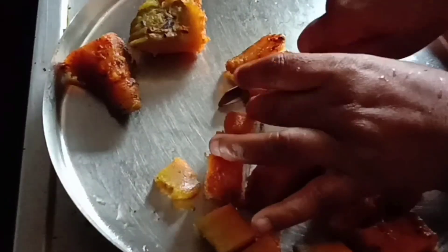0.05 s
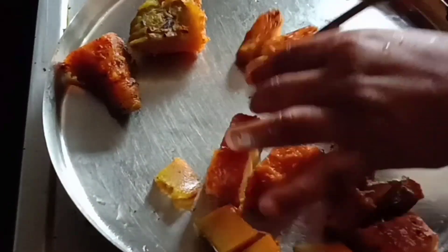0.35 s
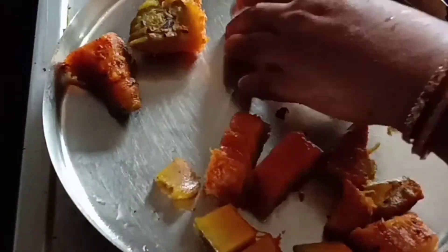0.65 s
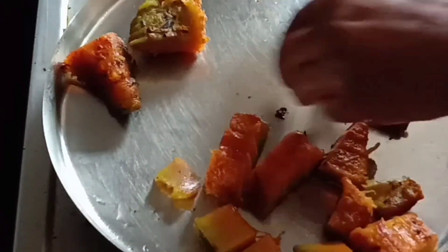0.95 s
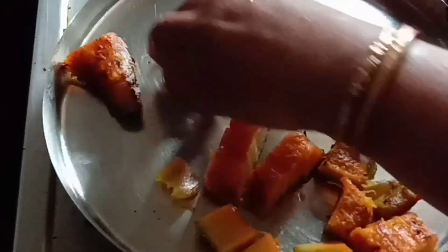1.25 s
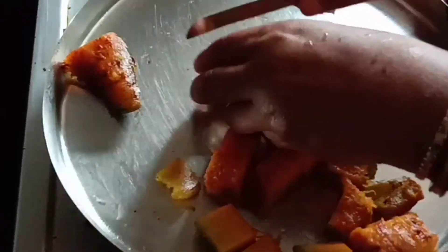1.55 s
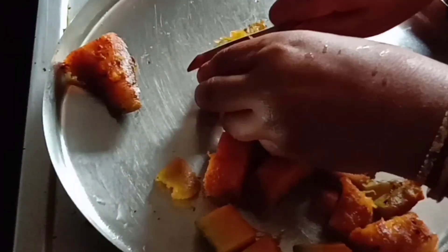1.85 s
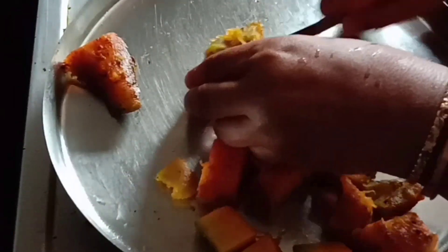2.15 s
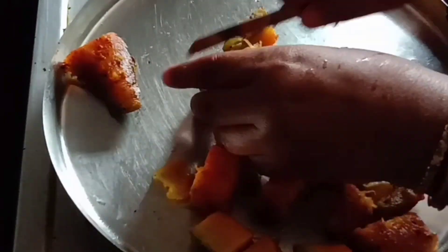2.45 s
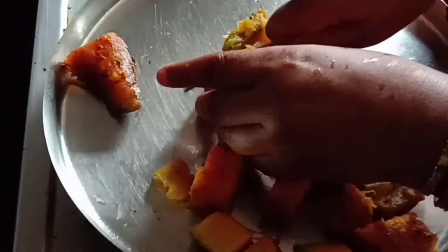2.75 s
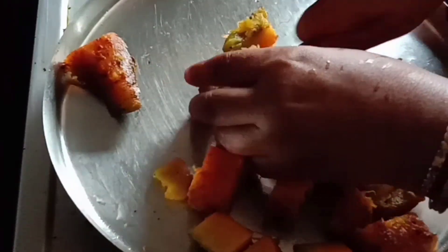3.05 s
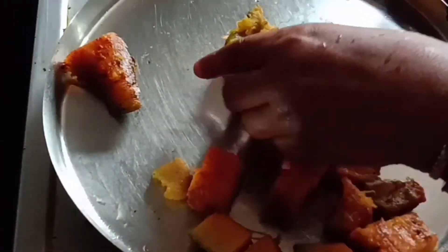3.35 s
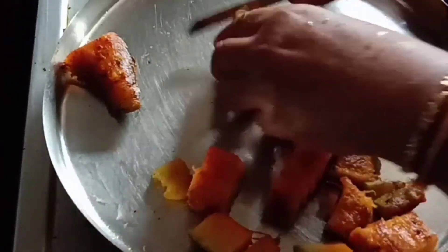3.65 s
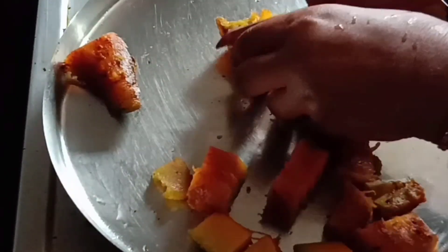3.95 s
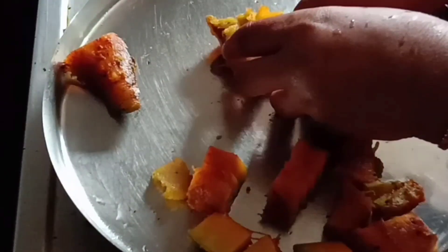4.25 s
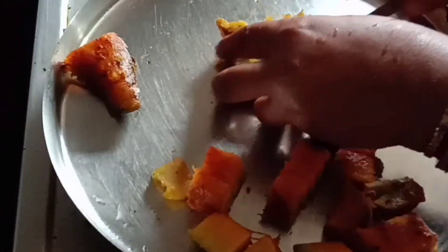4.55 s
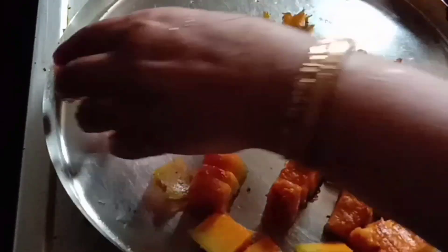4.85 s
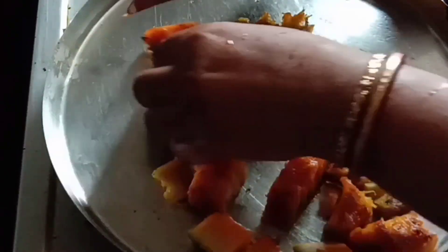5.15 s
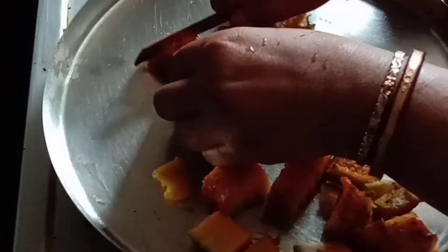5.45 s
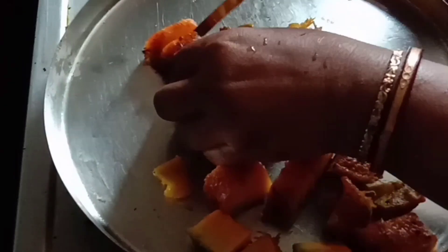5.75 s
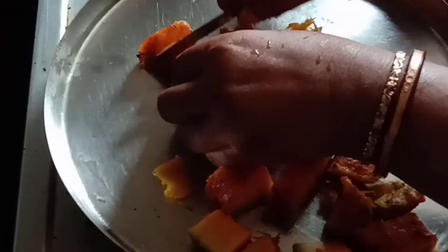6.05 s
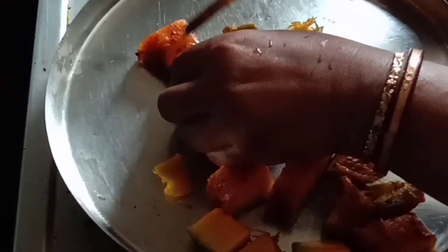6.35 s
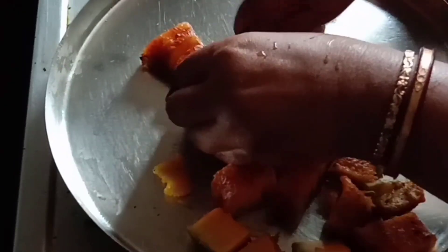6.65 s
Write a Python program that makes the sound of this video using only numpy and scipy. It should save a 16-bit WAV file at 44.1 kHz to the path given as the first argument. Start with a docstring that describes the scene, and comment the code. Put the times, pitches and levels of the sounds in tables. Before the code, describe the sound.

Wet pumpkin squishes and smacks as it is handled and sliced on a metal plate near the microphone. The knife thuds through the flesh and clicks on the steel at irregular moments, loudest in the middle, where it also gives two tiny squeals. Moist rubbing fills the gaps. A low motor hum and faint hiss continue in the slightly echoing kitchen.

```python
"""In a small kitchen with hard walls, a knife cuts soft cooked pumpkin on a steel plate, close by.
The blade thuds through the flesh, clacks on the plate and squeals as it skates over the steel.
Wet pulp tears in tiny pops, which blend into squelches and hiss as blade and fingers rub it.
The plate rings briefly and the walls echo the work. Behind it all are a low motor and a faint hiss."""
import sys
import numpy as np
from scipy import signal
from scipy.fft import rfft, irfft, next_fast_len
from scipy.io import wavfile
from scipy.ndimage import uniform_filter1d

SR = 44100
rng = np.random.default_rng(int(sys.argv[2]) if len(sys.argv) > 2 else 0)


def write(x):
    x = np.atleast_2d(x).T
    wavfile.write(sys.argv[1], SR, np.round(np.clip(x, -1, 1) * 32767).astype(np.int16))


N = 299880
TIME = np.arange(N) / SR

# Levels are relative. t60 is the time to fade by 60 dB; width is how wide a band of pitches is.
# blade hits plate: t/s, click level/dB, click f/Hz, click t60/s, plate ring level/dB
TAPS = [(.237, -35, 3160, 0.12, -66), (.479, -21.5, 5760, 0.022, -39), (.869, -42.5, 7500, 0.053, -63),
        (1.088, -41.5, 6500, 0.24, -58), (1.704, -28, 4740, 0.056, -55), (1.726, -26, 4370, 0.026, -39.5),
        (2.5617, -18, 4350, 0.025, -33), (3.9979, -20.5, 4000, 0.019, -39), (5.251, -32, 2700, 0.043, -45),
        (5.324, -26, 4730, 0.045, -50), (5.9019, -22, 3480, 0.019, -36), (6.181, -36, 8400, 0.011, -77),
        (6.4418, -24, 4600, 0.012, -38)]
# blade breaks through: peak t/s, build-up/s, thud level/dB, crunch level/dB, groan level/dB, groan f/Hz
CUTS = [(0.501, 0.01, -43, -35, -67, 302), (1.73, 0.031, -34.5, -35.5, -40.5, 306),
        (2.607, 0.031, -31.5, -32.5, -41.5, 261), (4.072, 0.034, -27, -29.5, -42, 300),
        (5.33, 0.095, -49.5, -60, -71, 280), (5.919, 0.017, -38, -39, -50.5, 232),
        (6.455, 0.0097, -40.5, -57, -52, 248)]
# blade skates on steel: t/s, length/s, level/dB
SQUEALS = [(2.567, 0.041, -39), (4.034, 0.064, -34)]
# the blade's own notes: f/Hz, width/Hz, level/dB
BLADE_NOTES = [(4320, 46, -1.5), (4530, 75, 1.5), (6120, 90, -3), (6700, 70, 2), (8580, 80, -15),
               (11300, 80, -11)]
# big tears in the pulp, plus one soft tap of the blade near 2.6 s: t/s, length/s, f/Hz, width/Hz, level/dB
SQUELCHES = [(0.385, 0.057, 490, 294, -50), (0.467, 0.012, 1530, 1200, -37.5),
             (0.553, 0.013, 6340, 4100, -36.5), (0.56, 0.15, 2020, 1410, -55),
             (0.719, 0.02, 5400, 1790, -37), (0.822, 0.013, 1940, 600, -55),
             (0.825, 0.087, 5950, 3460, -52.5), (0.918, .035, 3550, 600, -63),
             (1.002, 0.021, 1184, 300, -50.5), (1.003, .018, 3660, 700, -53),
             (1.088, 0.023, 5300, 3700, -45.5), (1.285, 0.022, 3200, 1100, -53.5),
             (1.38, 0.03, 2300, 900, -46), (1.417, 0.017, 3480, 2100, -32.5),
             (1.463, 0.017, 7200, 900, -51), (1.522, .02, 4970, 1400, -44.5),
             (1.597, 0.013, 3970, 2580, -30.5), (1.713, 0.026, 727, 260, -40),
             (1.824, 0.05, 4000, 1100, -42.5), (1.836, 0.012, 2250, 450, -42),
             (1.913, 0.036, 1030, 497, -46.5), (2.134, .025, 4800, 2400, -40.5),
             (2.281, 0.0098, 1520, 1300, -34), (2.351, 0.067, 1020, 594, -42.5),
             (2.512, 0.053, 5750, 900, -42), (2.596, 0.02, 1040, 900, -32.5),
             (2.678, 0.056, 1410, 600, -43), (2.843, 0.028, 740, 606, -50),
             (2.909, 0.046, 6300, 4660, -35.5), (3.077, .018, 6300, 700, -43),
             (3.088, 0.023, 3800, 1000, -45.5), (3.285, 0.016, 5670, 1600, -39),
             (3.336, 0.015, 4860, 3000, -38), (3.413, 0.017, 2850, 1700, -42.5),
             (3.465, 0.024, 900, 450, -43.5), (3.653, .012, 3320, 800, -39),
             (3.794, .03, 5850, 2000, -42.5), (3.804, 0.02, 880, 700, -44.5), (4.3, 0.018, 7200, 5000, -35),
             (4.34, 0.023, 5000, 6200, -34), (4.45, 0.025, 4900, 3100, -37),
             (4.592, 0.022, 6480, 1100, -35), (4.995, 0.012, 6200, 4960, -38),
             (5.075, 0.023, 1270, 890, -38), (5.182, 0.012, 2300, 800, -41.5),
             (5.251, 0.0087, 2290, 700, -39), (6.043, 0.0086, 3300, 600, -39),
             (6.068, .018, 3570, 900, -53), (6.159, 0.03, 600, 303, -54), (6.194, 0.011, 5470, 1200, -41),
             (6.195, 0.037, 2000, 250, -59), (6.271, 0.044, 2720, 700, -54),
             (6.349, 0.036, 7270, 1800, -47), (6.352, 0.018, 2980, 600, -52),
             (6.584, 0.03, 2220, 700, -48.5), (6.627, 0.019, 4970, 1400, -51),
             (6.68, 0.022, 2200, 550, -51), (6.758, 0.034, 4140, 3400, -46)]
# wet pieces skid: t/s, length/s, first f/Hz, last f/Hz, level/dB
SLIPS = [(4.227, 0.025, 4700, 2800, -36.5), (5.057, 0.047, 3820, 1130, -38),
         (5.147, 0.066, 6350, 2230, -38), (5.475, 0.022, 3000, 2170, -44.5),
         (5.536, 0.043, 6000, 2600, -40), (5.762, 0.033, 7400, 3700, -39.5)]
# a long spell of pressing and sliding the pieces: t/s, hiss level/dB, dull rub level/dB
HANDLING = [(1.2, -62.5, -78), (1.4, -46.5, -51), (1.57, -49.5, -68), (1.8, -43.5, -55), (1.97, -37.5, -44),
            (2.2, -41, -52.5), (2.4, -37, -39), (2.52, -42, -48.5), (2.72, -38.5, -45.5), (2.85, -38, -38),
            (3.05, -39, -46.5), (3.18, -41.5, -45), (3.3, -39.5, -45), (3.8, -39.5, -39.5),
            (3.94, -40.5, -41), (4.18, -41.5, -41), (4.45, -42.5, -45), (4.8, -38.5, -45),
            (4.96, -42.5, -43.5), (5.1, -42, -44), (5.55, -38.5, -44.5), (5.72, -42, -42.5),
            (5.822, -40.5, -41.5)]
# single strokes of blade or fingers: t/s, length/s, hiss level/dB, dull rub level/dB
STROKES = [(0, 0.05, -42.5, -55), (0.233, 0.091, -40, -46.5), (0.369, 0.18, -41.5, -49.5),
           (0.488, 0.14, -37, -41.5), (0.653, 0.095, -43.5, -40.5), (1.517, 0.016, -47, -69),
           (1.974, 0.018, -35, -62), (2.205, 0.082, -35.5, -47), (3.008, 0.014, -34.5, -45),
           (3.209, 0.017, -36.5, -40.5), (3.37, 0.013, -42, -57), (3.512, 0.055, -41, -58),
           (3.718, 0.028, -41, -42), (4.241, 0.078, -34.5, -44.5), (5.424, 0.057, -42.5, -56),
           (6.029, 0.052, -42, -61), (6.23, 0.16, -49, -83), (6.348, 0.28, -48, -55),
           (6.592, 0.23, -44, -54)]
# light drags over bare steel: t/s, length/s, level/dB
DRAGS = [(0.0, 0.024, -48), (0.253, 0.096, -51.5), (.62, 0.14, -52), (0.799, 0.11, -58),
         (0.941, 0.061, -58.5), (1.118, .06, -63), (1.25, 0.12, -62), (3.091, .1, -49.5),
         (3.219, 0.33, -49), (4.17, .2, -51.5), (5.928, 0.025, -38), (6.056, 0.04, -51.5),
         (6.314, .07, -56.5), (6.46, 0.11, -47)]
# the plate's own notes, damped by the food on it: f/Hz, level/dB, t60/s
PLATE_NOTES = [(255.3, -5.5, 0.22), (305, -15, 0.2), (374.5, -11, 0.2), (450.6, -6, 0.13),
               (623, 3.5, 0.032), (757, -26, 0.29), (1002, -11, 0.35), (1230, 1.5, 0.23), (1260, -5, 0.24),
               (1500, -8, 0.23), (1700, -11, 0.28), (1957, -15, 0.21), (2562, -19, 0.17),
               (3170, -3.5, 0.11), (3530, -3, 0.13), (4325, -1, 0.067), (4500, -10, 0.1), (5200, -7, 0.08),
               (5800, -5, 0.11), (7230, -8, 0.21), (7550, -9, 0.1)]
# tone of the two parts of a cut: f/Hz, level/dB
THUD_TONE = [(45, -10), (110, -18), (180, -14), (260, 7), (420, 3), (540, 0), (800, -4.5), (1200, -0.5),
             (1700, -8), (4000, -20)]
CRUNCH_TONE = [(200, 4), (900, -37), (2500, 15.5), (5000, 18), (9000, 13.5), (16000, -1)]
# tone of the three parts of rubbing: f/Hz, level/dB
RUB_TONE = [(120, -16), (260, -12), (500, 1.5), (800, 0), (1200, 4.5), (1900, 0.5), (3000, -8.5),
            (8000, -48.5)]
HISS_TONE = [(300, -7), (1200, -35), (2200, 3), (3500, 5.5), (5500, 7), (7500, 7), (10000, -20),
             (16000, 5.5)]
SIZZLE_TONE = [(3000, -29), (7000, -9), (9500, 5), (16000, 0.5)]
# how long the kitchen echoes: f/Hz, t60/s
ROOM_T60 = [(150, 0.45), (800, 0.26), (2500, 0.25), (6000, 0.28), (15000, 0.2)]
# the motor's loudness over time: t/s, drone level/dB, overtone level/dB
MOTOR_LEVELS = [(0.0, -46.5, -49.5), (0.14, -41.5, -53), (0.24, -38.5, -42.5), (0.45, -37, -40),
                (0.64, -46.5, -44), (0.7, -38.5, -50), (1.399, -41.5, -49.5), (1.78, -48.5, -56),
                (1.82, -43, -44.5), (2.2, -45.5, -47.5), (2.95, -43.5, -52), (3.15, -51.5, -55.5),
                (3.81, -49, -54), (4.05, -48.5, -44.5), (4.26, -52, -56), (5.7, -47.5, -54.5),
                (6.67, -51, -58.5), (6.8, -62, -58)]
# the motor's wavering low and higher notes: f/Hz, width/Hz, level/dB
DRONE_NOTES = [(70, 14.2, -6.5), (91.6, 8.4, -1.5), (101.5, 6.5, -3)]
OVERTONES = [(172.6, 12.43, 1.36), (198.3, 10.55, -1.36)]
# tone of the background hiss: f/Hz, level/dB
ROOM_TONE = [(250, -11), (520, 3), (950, -14), (1100, 7), (1200, 18.5), (1350, 8), (1700, 5), (2300, 5),
             (2900, -9), (3600, -4), (6000, 8.5), (7400, 5), (9000, -5), (16000, -15)]
# how the microphone lifts or lowers each pitch: f/Hz, level/dB
MICROPHONE = [(20, -1.5), (5400, 0.5), (6000, 2), (6330, 1.5), (6520, -4), (6720, -3), (7050, 3),
              (7500, 3.5), (8400, -1.5), (8750, -0.5), (9200, -4.5), (10500, -7.5), (13800, -9.5),
              (15100, 0), (15450, 0), (15800, -32)]

SPOT_DB = 4  # how much each plate note varies with the spot that is touched


def cuts(release_s=0.0075, grain_db=3.0, cut_db=3):
    """Force builds as fibres snap, the plate thuds under the blade, and the force lets go."""
    push, snap = np.zeros(N), np.zeros(N)
    for s, build_s, thud_db, crunch_db, *_ in CUTS:
        force = np.exp(-np.maximum((s - TIME) / build_s, (TIME - s) / release_s))
        push += force * undb(thud_db)
        snap += force * undb(crunch_db)
    thud = unit(colour(crackle(N, 3000, grain_db), THUD_TONE))
    crunch = unit(colour(crackle(N, 2500, grain_db), CRUNCH_TONE))
    return undb(cut_db) * (push * thud + snap * crunch)


def taps(breadth=1.5, tap_db=-12, crack_db=-5.5, crack_t60=0.0088, contact_s=.001):
    """The steel edge cracks on the plate, chatters while it touches, then rings very briefly."""
    out, t = np.zeros(N), TIME[:SR // 10]
    since_contact = np.maximum(t - contact_s, 0)
    for s, db, hz, t60, _ in TAPS:
        ring = band(rng.standard_normal(len(t)) * fade(since_contact, t60), hz, breadth * hz, order=1)
        crack = band(rng.standard_normal(len(t)) * fade(since_contact, crack_t60), 10300, 18000)
        sharpness = 2 * undb(crack_db) * crack_t60 / t60  # a slow, scraping touch has little crack
        click = remove_pitch(unit(ring) + sharpness * unit(crack))
        add(out, s, click * undb(db + tap_db))
    return out


def groans(groan_db=-3.5, lead_s=.08, length_s=0.08, width_hz=130):
    """Squashed flesh groans just before it gives way, each piece at its own low pitch."""
    out = np.zeros(N)
    for s, *_, db, hz in CUTS:
        add(out, s - lead_s, tear(length_s, hz, width_hz, per_s=3000, order=3) * undb(db + groan_db))
    return out


def squeals():
    """The edge sticks and slips on bare steel, so the blade rings in thin, uneven whistles."""
    out = np.zeros(N)
    for s, length_s, db in SQUEALS:
        whistles = sum(undb(note_db) * tear(length_s, hz, width_hz, per_s=4000, order=1)
                       for hz, width_hz, note_db in BLADE_NOTES)
        add(out, s, unit(whistles) * undb(db))
    return out


def squelches(squelch_db=-1.0):
    """Big tears open pockets in the pulp; each pocket's size gives it its own pitch. One row near 2.6 s is a
    soft tap of the blade instead."""
    out = np.zeros(N)
    for s, length_s, hz, width_hz, db in SQUELCHES:
        add(out, s, tear(length_s, hz, width_hz, per_s=3700, order=3) * undb(db + squelch_db))
    return out


def slips(slip_db=1.0, breadth=0.23, steps=6):
    """A wet piece skids: its rasp falls in pitch as the wet film under it stretches."""
    out = np.zeros(N)
    for s, length_s, from_hz, to_hz, db in SLIPS:
        for k, hz in enumerate(np.geomspace(from_hz, to_hz, steps)):
            rasp = tear(0.0069, hz, breadth * hz, per_s=5400) / np.sqrt(steps / 2)
            add(out, s + length_s * k / steps, rasp * undb(db + slip_db))
    return out


def smacks(count=320, quietest_db=-7.5, range_db=4, breadth=0.55):
    """Many small tears smack in the pulp, louder when the rubbing is louder."""
    out = np.zeros(N)
    hiss, rub = rubbing_effort()
    for k, (when, pitch, length, strength) in enumerate(rng.random((count, 4))):
        i = int((k + when) / count * (N - 1))
        hz = 1000 * 12 ** (pitch ** .7)
        force = rub[i] if hz < 2500 else hiss[i]
        burst = tear(0.013 + 0.0059 * length, hz, breadth * hz, per_s=2200)
        add(out, i / SR, burst * force * undb(quietest_db + range_db * strength))
    return out


def rubbing(rooms, hiss_db=-2.5, rub_db=-1.4, sizzle_db=-10.5):
    """Pulp sticks and slips on steel with a moist crackle: a patchy, dull rub and a smoother hiss."""
    grains = 0
    for hz in np.geomspace(200, 14000, 20):
        patch = band(crackle(N, 1100, 3.0), hz, .24 * hz)
        patchy_db = 4.5 if hz < 2000 else 3.0
        grains = grains + unit(patch * undb(patchy_db * wander(32))) * np.sqrt(hz)
    grains = resound(grains, rooms, ring_db=-51)
    hiss = undb(hiss_db) * unit(colour(grains, HISS_TONE))
    rub = undb(rub_db) * unit(colour(grains, RUB_TONE))
    hiss_gain, rub_gain = rubbing_effort()
    # a fine, high sizzle that fades when the hiss is quiet
    pops = resound(crackle(N, 3200, 2.0) * undb(2.0 * wander(20)), rooms, ring_db=-64)
    sizzle_gain = (hiss_gain / hiss_gain.max()) ** 0.34
    sizzle = undb(sizzle_db) * unit(colour(pops, SIZZLE_TONE)) * sizzle_gain
    return hiss_gain * (hiss + sizzle) + rub_gain * rub


def rubbing_effort():
    """How strong the hiss and the dull rub are over time: the long handling plus single strokes."""
    handling = np.array(gains(HANDLING)) * touch(HANDLING[0][0], HANDLING[-1][0])
    power = handling ** 2
    for s, length_s, hiss_db, rub_db in STROKES:
        power = power + np.outer(undb([hiss_db, rub_db]), touch(s, s + length_s)) ** 2
    return np.sqrt(power)


def touch(start_s, end_s, grip_s=0.005, t60=0.21):
    """A touch grips quickly, holds, and dies away once the hand stops."""
    return np.clip((TIME - start_s) / grip_s, 0, 1) * fade(np.maximum(TIME - end_s, 0), t60)


def tear(length_s, hz, width_hz, per_s, order=2):
    """A run of tiny pops rings around one pitch; it swells and mostly fades within length_s."""
    progress = TIME[:int(2 * length_s * SR)] / length_s
    swell = np.sqrt(progress) * np.exp(-2 * progress ** 2)
    return unit(band(crackle(len(progress), per_s, 4.7) * swell, hz, width_hz, order=order))


def crackle(size, per_s, spread_db):
    """Wet cells burst at random moments, some louder than others."""
    happens = rng.random(size) < per_s / SR
    sign = rng.choice([-1, 1], size)
    strength = undb(spread_db * np.clip(rng.standard_normal(size), -2, 2))
    return unit(happens * sign * strength)


def plate_knocks(knock_db=-3.5, hardness_db=1.5, hard_hz=3000):
    """Each tap rings the plate: every spot has its own mix of notes, higher for a sharper click."""
    out, rings = np.zeros(N), plate_rings()
    octaves = np.log2(np.array(PLATE_NOTES)[:, 0] / 1000)
    for s, _, hz, _, ring_db in TAPS:
        spot_db = SPOT_DB * rng.standard_normal(len(rings))
        tilt_db = hardness_db * np.log2(hz / hard_hz) * octaves
        add(out, s, undb(knock_db + ring_db + spot_db + tilt_db) @ rings)
    return out


def plate_drags(edge_hz=1500, width_hz=2200):
    """A piece or the blade drags lightly over bare steel, and the plate sings faintly."""
    out = np.zeros(N)
    for s, length_s, db in DRAGS:
        drag = tear(length_s / 2, edge_hz, width_hz, per_s=3300, order=1)
        ring = signal.fftconvolve(drag, plate_rings().sum(axis=0))
        ring *= np.sqrt(len(drag)) / np.linalg.norm(ring)  # same energy as the drag
        add(out, s, ring * undb(db))
    return out


def plate_rings():
    """The struck plate's fading notes, one per row."""
    t = TIME[:SR // 2]
    return np.array([undb(db) * np.cos(2 * np.pi * hz * t) * fade(t, t60)
                     for hz, db, t60 in PLATE_NOTES])


def resound(x, rooms, ring_db):
    """Let x ring the plate and the room; moving hands keep changing the touched spot and the echoes."""
    out, rings = np.zeros(N), plate_rings()
    for stretch, room in zip(np.array_split(np.arange(N), len(rooms)), rooms):
        ring = undb(ring_db + SPOT_DB * rng.standard_normal(len(rings))) @ rings
        add(out, TIME[stretch[0]], signal.fftconvolve(x[stretch], room + ring))
    return out


def kitchen_echo(echo_db, build_s, wall_hz):
    """The room's answer to one click: the click itself, then a wash of echoes from the walls."""
    t = TIME[:SR // 2]
    edges = np.geomspace(100, 20000, 9)
    build_up = np.minimum(t / build_s, 1)
    tail = 0
    for low, high in zip(edges, edges[1:]):
        hz = np.sqrt(low * high)
        noise = band(rng.standard_normal(len(t)), hz, high - low, order=4)
        echoes = noise * fade(t, lookup(hz, ROOM_T60)) * build_up
        dulling = 1 / np.hypot(1, hz / wall_hz)  # the walls soak up some treble
        tail = tail + unit(echoes) * np.sqrt(high - low) * dulling
    response = undb(echo_db) * unit(tail) / np.sqrt(len(t))
    response[0] += 1  # the direct sound
    response = flatten_tone(response, over_hz=120)
    return response / np.linalg.norm(response)


def motor(rumble_db=-61, throb_db=2.5, murk_db=-14, flutter_db=3.5, flutter_per_s=22):
    """A motor drones and throbs, with weaker overtones, over a faint rumble."""
    out = undb(rumble_db) * unit(band(rng.standard_normal(N), 100, 170, order=1))
    flutter = unit(undb(flutter_db * wander(flutter_per_s)))  # all notes dip and swell together
    for gain, notes in zip(gains(MOTOR_LEVELS), (DRONE_NOTES, OVERTONES)):
        hum = 0
        for hz, width_hz, db in notes:
            throb = undb(db + throb_db * wander(18))
            drifting_hz = hz + width_hz / 2 * wander(40)  # close notes pulse unevenly together
            hum = hum + throb * np.sin(2 * np.pi * np.cumsum(drifting_hz) / SR)
        murk = unit(band(rng.standard_normal(N), notes[-1][0], 67, order=4))  # noise at the top note
        out = out + gain * flutter * (unit(hum) + undb(murk_db) * murk)
    return out


def room_tone(floor_db=-62, singing_db=-63.0):
    """A faint hiss with a hollow note in it; the plate sings softly along."""
    hiss = undb(floor_db + wander(25)) * unit(colour(rng.standard_normal(N), ROOM_TONE))
    noise = band(rng.standard_normal(N), 4200, 4000, order=1)
    singing = signal.fftconvolve(noise, plate_rings().sum(axis=0))[:N]
    return hiss + undb(singing_db) * unit(singing)


def undb(db):
    """Turn decibels into a number to multiply by."""
    return 10 ** (np.asarray(db) / 20)


def unit(x):
    """Scale to an average strength (rms) of 1."""
    return x / np.sqrt(np.mean(x ** 2) + 1e-18)


def gains(table):
    """Turn each dB column of a timed table into a gain for every sample."""
    s, *columns = np.transpose(table)
    return [undb(np.interp(TIME, s, db)) for db in columns]


def add(track, s, x):
    """Mix x into the track at s seconds."""
    i = max(int(s * SR), 0)
    track[i:i + len(x)] += x[:N - i]


def fade(t, t60):
    """Die away, 60 dB down after t60."""
    return np.exp(-np.log(1000) * t / t60)


def wander(per_s):
    """Drift between random values, mostly within -1 to 1."""
    hold = int(SR / per_s)
    count = N // hold + 2
    return np.interp(np.arange(N) / hold, np.arange(count), rng.standard_normal(count))


def lookup(hz, points):
    """Read between (f/Hz, value) points, with octaves evenly spaced."""
    f, value = np.transpose(points)
    return np.interp(np.log(hz + 1), np.log(f), value)


def colour(x, points):
    """Shape the tone of x to follow (f/Hz, level/dB) points."""
    size = 2 * next_fast_len(len(x) // 2 + 2048)
    curve = undb(lookup(np.fft.rfftfreq(size, 1 / SR), points))
    cepstrum = irfft(np.log(curve))
    # fold it in half, so the filter never rings ahead of a sound
    cepstrum[1:size // 2] *= 2
    cepstrum[size // 2 + 1:] = 0
    return irfft(rfft(x, size) * np.exp(rfft(cepstrum)))[:len(x)]


def band(x, hz, width_hz, order=2):
    """Keep the pitches around hz."""
    low = np.hypot(hz, width_hz / 2) - width_hz / 2
    high = min(low + width_hz, .47 * SR)
    return signal.sosfilt(signal.butter(order, [low, high], "band", fs=SR, output="sos"), x)


def flatten_tone(x, over_hz):
    """Level out the broad humps in a burst's tone, keeping its fade and fine grain."""
    spectrum = rfft(x, 2 * len(x))
    power = uniform_filter1d(np.abs(spectrum) ** 2, int(2 * len(x) * over_hz / SR) + 1)
    return irfft(spectrum / np.sqrt(power + 1e-18))[:len(x)]


def remove_pitch(x, over_hz=1400, passes=5):
    """Smooth away a burst's narrow peaks, so it clacks with no note of its own."""
    size = 2 * len(x)
    power = uniform_filter1d(np.abs(rfft(x, size)) ** 2, int(size * over_hz / SR) + 1)
    shape = np.sqrt(np.abs(power))
    for _ in range(passes):
        phase = np.angle(rfft(x, size))
        x = irfft(shape * np.exp(1j * phase))[:len(x)]
    return x


def scene(contact_db=1.21, echo_changes=56):
    """Mix blade, pulp, plate and background; left and right are the same."""
    rooms = [kitchen_echo(echo_db=1.0, build_s=.003, wall_hz=13000) for _ in range(echo_changes)]
    contacts = taps() + groans() + cuts() + squeals() + squelches() + slips() + smacks()
    cutting = undb(contact_db) * resound(contacts, rooms, ring_db=-53.5)
    mono = cutting + plate_knocks() + plate_drags() + rubbing(rooms) + motor() + room_tone()
    return np.array([mono, mono])


def record(dry, top_hz=16500):
    """The phone's microphone opening colours the treble, and the very top is cut off."""
    coloured = np.array([colour(channel, MICROPHONE) for channel in dry])
    return signal.sosfilt(signal.ellip(8, .2, 70, top_hz, fs=SR, output="sos"), coloured)


dry = scene()
out = record(dry)
write(out)
```